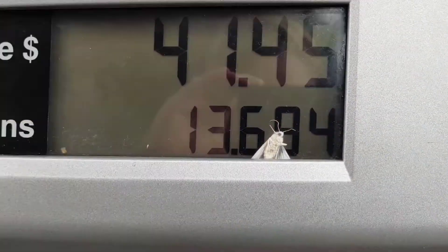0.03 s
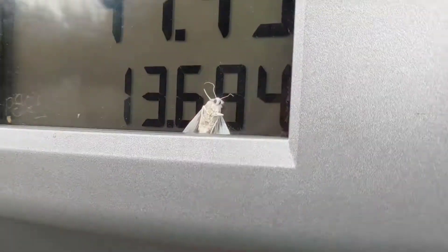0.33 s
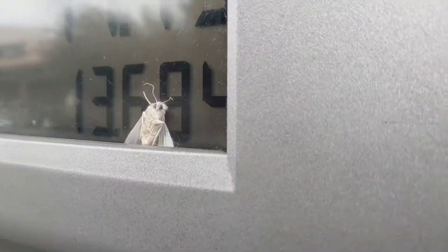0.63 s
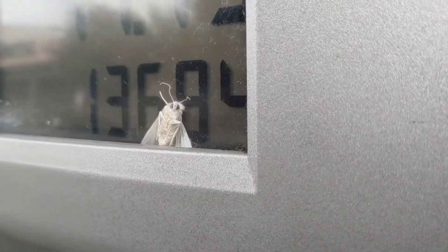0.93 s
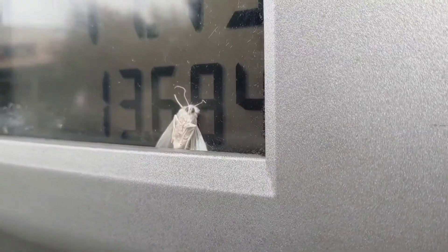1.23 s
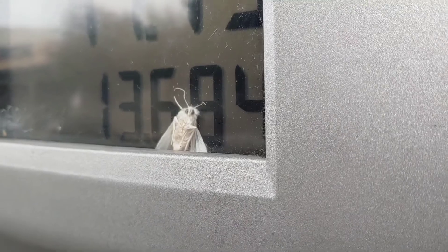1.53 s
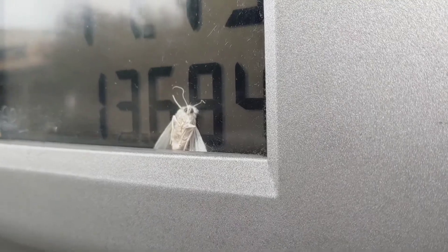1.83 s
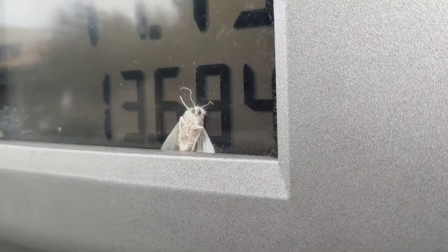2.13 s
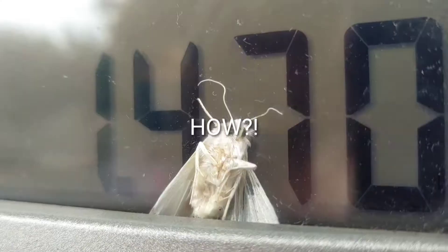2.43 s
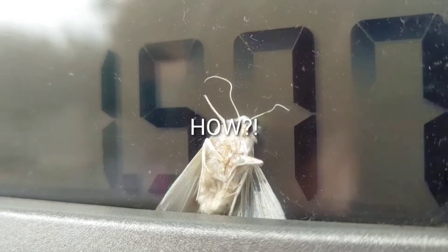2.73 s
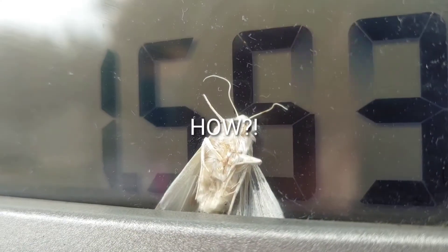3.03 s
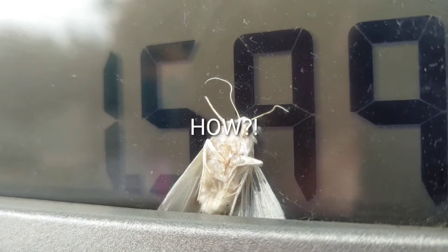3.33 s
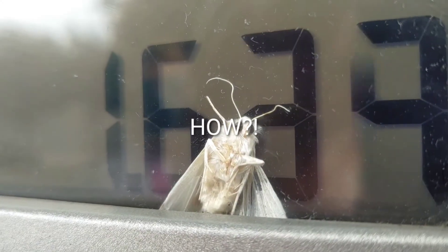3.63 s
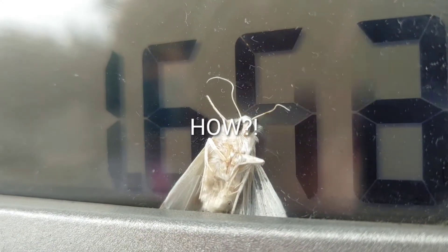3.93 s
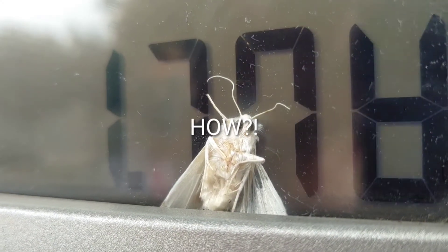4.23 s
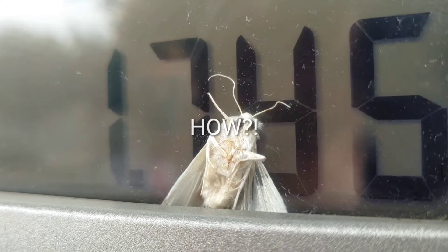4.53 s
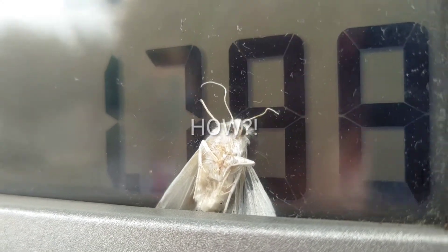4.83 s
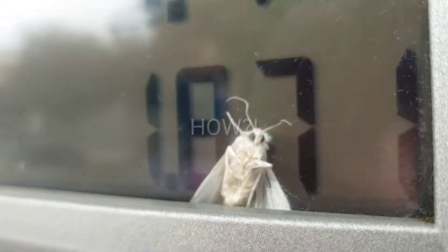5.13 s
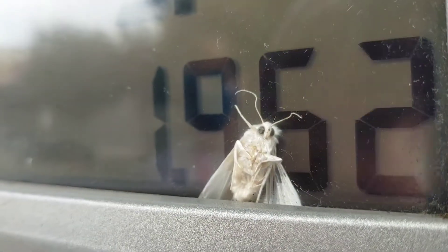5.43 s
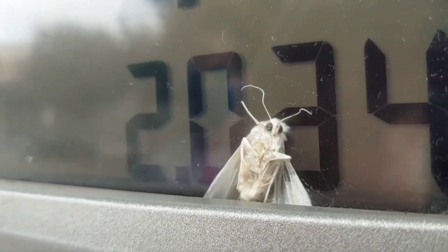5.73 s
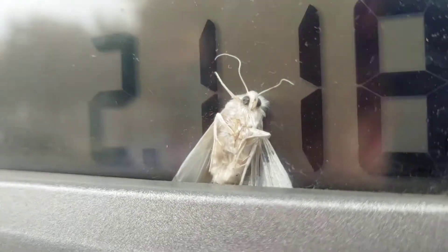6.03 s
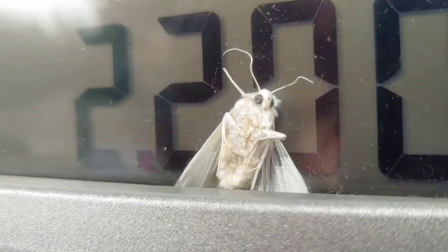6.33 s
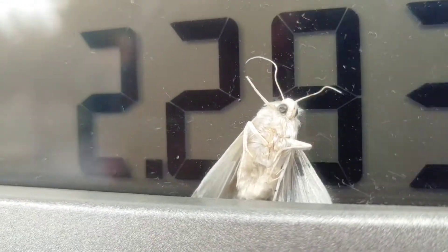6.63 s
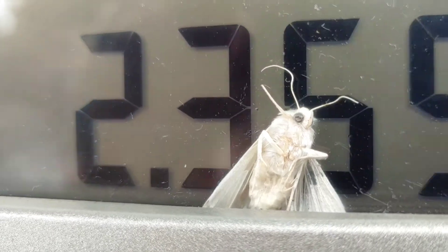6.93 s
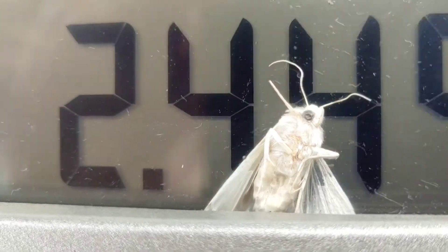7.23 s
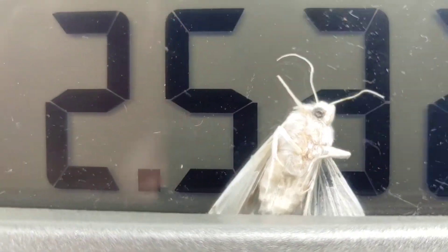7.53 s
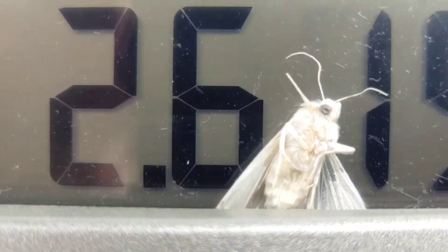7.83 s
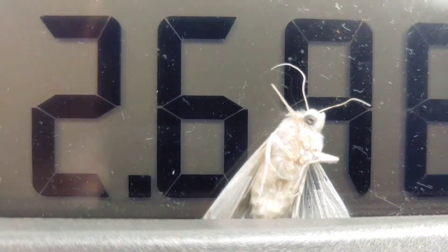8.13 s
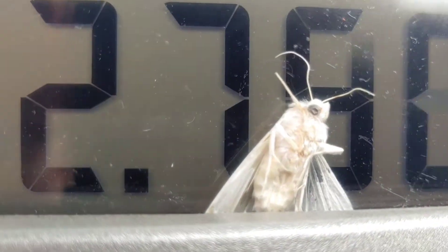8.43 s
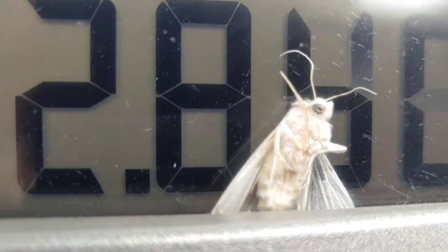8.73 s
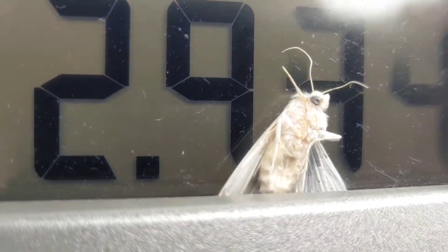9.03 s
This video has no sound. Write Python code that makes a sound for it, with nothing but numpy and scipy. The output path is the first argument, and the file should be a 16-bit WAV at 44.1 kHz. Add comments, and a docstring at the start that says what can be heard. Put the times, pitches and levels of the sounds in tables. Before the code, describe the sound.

A finger rubs the microphone beside a humming, rushing fuel pump; the nozzle clunks, then the pump continues quieter as a distant car pulls away.

```python
"""A finger rubs, then covers, the left microphone beside a running fuel pump.
Fuel rushes through the ringing cabinet under a thin motor whine; nozzle and hose clunk.
The sound cuts off at 2.4 s and fades back in, quieter, with both microphone ports open.
Later a distant car pulls away through its gears and the road rumble grows."""
import sys
import numpy as np
from scipy import signal
from scipy.fft import rfft, irfft
from scipy.io import wavfile
from scipy.ndimage import uniform_filter1d

SR = 44100
rng = np.random.default_rng(int(sys.argv[2]) if len(sys.argv) > 2 else 0)


def transcribe(signal):
    """Save signal, clipped to [-1, 1], as a 16-bit WAV file at the path in sys.argv[1]."""
    frames = np.atleast_2d(signal).T
    limited = np.clip(frames, -1, 1)
    pcm = np.round(limited * 32767).astype(np.int16)
    wavfile.write(sys.argv[1], SR, pcm)


N = 404397
T = np.arange(N) / SR
CUT_S, RESUME_S = 2.41, 2.445
DIP_START_S, DIP_END_S, DIP_DB = 4.864, 4.881, 25.4

# Throttle pulls. Each row: start in seconds, length in seconds, initial firing rate in Hz,
# climb in Hz per second, level in dB, fade in dB per second.
CAR_PULLS = [(5.602, 0.63, 94, 26.5, -45.5, -1.5), (6.6, 0.85, 125.6, 62, -43.5, 6),
             (7.653, 0.53, 192.7, 57.4, -55, 4), (8.571, 0.87, 154.9, 67.8, -53.5, 2)]
# Finger strokes. Each row: start in seconds, length in seconds, level in dB.
FINGER_STROKES = [(0.013, .185, -24), (0.273, 0.15, -27.5), (0.372, 0.11, -23.5)]
# Rubbing skin. Each row: frequency in Hz, relative level in dB.
RUB_SPECTRUM = [(20, -1), (55, 8), (140, 1), (300, -15.5), (600, -25), (1200, -40.5), (3000, -53),
                (6000, -73), (15000, -64)]
# Nozzle and hose knocks. Each row: start in seconds, level in dB, low-pass in Hz, high-pass in Hz,
# decay time constant in seconds, main ring in Hz.
CLUNK_HITS = [(0.856, -30.5, 1300, 500, 0.018, 785), (.961, -32, 1290, 500, 0.013, 785),
              (1.008, -29.5, 1400, 600, 0.0051, 1480), (1.13, -32.5, 1200, 600, .026, 1000),
              (1.29, -23.5, 1700, 600, 0.0063, 122), (1.295, -23.5, 2780, 600, 0.015, 1923),
              (1.343, -24.5, 1400, 500, 0.012, 118), (1.631, -36, 1500, 400, .01, 1460),
              (1.947, -20.5, 1560, 300, 0.015, 430), (2.024, -21, 2070, 500, 0.016, 973),
              (2.057, -25.5, 1500, 600, .012, 1070), (2.235, -29, 1920, 160, 0.018, 230.6),
              (2.3, -22.5, 1100, 250, 0.013, 187), (2.359, -25, 1600, 350, 0.014, 1364)]
# Hardware resonances. Each row: centre in Hz, width in Hz, boost in dB.
HARDWARE_MODES = [(228, 57, 24), (440, 132, 11.5), (758, 770, 10.5), (1074, 330, 4.5), (1436, 340, 9.5),
                  (1930, 400, 9.5), (2820, 1100, 4.5), (4220, 340, 7)]
# Pump motor. Each row: time in seconds, shaft rate in Hz, unsteadiness as a factor.
MOTOR_RUN = [(0, 262.6, 0.8), (2.41, 262.6, 0.9), (2.445, 262, 0.17), (4.864, 261.7, .08),
             (4.881, 262, 0.94), (9.17, 261.9, 1.1)]
# Weak shaft orders. Each row: multiple, level in dB before the cut, level in dB after it.
WEAK_ORDERS = [(7, -91, -105.5), (9, -61, -105), (13, -72, -104), (14, -82, -88), (16, -77.5, -91),
               (17, -72.5, -99), (26, -87, -85.5), (30, -85, -96.5), (39, -84, -92)]
# The whine swells and fades as the microphones move through its standing waves.
# Before the cut, right port. Each row: time in seconds, 6th order in dB, 15th order in dB.
WHINE_BEFORE = [(0, -42, -57), (.18, -39.5, -64.5), (.44, -44, -62.5), (.54, -55, -56.5), (.95, -58, -54),
                (1.28, -49, -59.5), (1.62, -60.5, -74.5), (1.88, -55, -64), (2.41, -54.5, -52)]
# After the cut. Each row: time in seconds, then levels in dB of the 6th order left and right,
# the 15th left and right, and the 18th at both ports.
WHINE_AFTER = [(3.0, -62.5, -57, -70.5, -72, -91), (5.7, -66, -57.5, -70.5, -73.5, -91),
               (6.45, -66.5, -68, -66, -76, -95), (7.25, -64, -85, -71, -87, -83),
               (7.95, -61.5, -72, -79.5, -89, -89), (9.17, -61, -57, -81, -77, -94)]
# Base spectra of fuel and road, before and after the cut.
# Each row: frequency in Hz, left density in dB, right density in dB.
RUSH_BEFORE = [(20, -72, -54.5), (49.3, -56, -46.5), (107, -74.5, -48), (212.5, -87, -56.5),
               (280, -91, -61), (335, -98.5, -68), (506, -99.5, -66.5), (564, -100, -66),
               (1310, -103, -72.5), (2060, -101, -77.5), (2560, -102, -81.5), (3520, -109, -91),
               (5460, -119, -97.5), (9000, -118, -99.5), (15000, -114, -104)]
RUSH_AFTER = [(20.6, -110, -72), (72.6, -67.5, -69), (149, -73.5, -72), (250, -79, -76),
              (477, -90.5, -86.5), (653, -85.5, -82.5), (806, -92, -88), (1330, -99.5, -89),
              (2050, -100, -96.5), (2530, -100.5, -103), (3780, -110.5, -110.5), (5800, -116.5, -114),
              (9600, -118.5, -117.5), (14900, -123, -122)]
# Cabinet resonances. Each row: centre in Hz, width in Hz, then boosts in dB before the cut,
# left after it and right after it.
CABINET_MODES = [(403, 71, 2.5, 1.1, 2), (536, 30, 3.5, 1.3, 1.5), (664.7, 25, 10.5, 1, 8.5),
                 (1072, 43, 0.5, 7.7, 7.5), (1517, 33, 5.5, 1.5, 8), (1966, 20, -1, 1, 5),
                 (2398, 30, 8, 7.3, 12), (2555, 30, 8, 6.5, 6.5), (2910, 60, 5, 2, 7),
                 (3423, 50, 9, 5, 2.5), (5830, 160, -0.5, 8.2, 5), (6440, 620, 0.5, 13.8, 0),
                 (6910, 170, 4, 9.5, -5), (8400, 300, 0, 1, 1.5), (9000, 300, 2, 4.5, 5.5),
                 (10380, 220, 5.5, 2.5, 6)]
# Microphone port colour. Each row: centre in Hz, width in Hz, gain in dB.
PORT_BANDS = [(7700, 510, -7.5), (11080, 700, -13.5), (12450, 460, 6)]
# Slow ramps of road rumble, left midrange, right midrange and flow hiss, in that order.
# Each row: start in seconds, end in seconds, initial gain in dB, final gain in dB.
RUSH_RAMPS = [(4.002, 7.8, -3.5, 1.3), (5.2, 8.7, -0.5, -1), (5.5, 8.6, 0.5, -8), (5.8, 9.17, 2.3, 7)]


def from_db(db):
    return 10 ** (np.asarray(db) / 20)


def unit_rms(x):
    return x / np.sqrt(np.mean(x ** 2) + 1e-20)


def curves(rows, at):
    """Table columns interpolated along the first."""
    first, *columns = np.transpose(rows)
    return np.array([np.interp(at, first, c) for c in columns])


def spectra(rows, hz):
    """Table columns interpolated over log frequency."""
    first, *columns = np.transpose(rows)
    return np.array([np.interp(np.log(hz + 1), np.log(first + 1), c) for c in columns])


def bell(hz, centre_hz, width_hz):
    """Gaussian of height 1; full width at half height."""
    return .5 ** ((2 * (hz - centre_hz) / width_hz) ** 2)


def bands_db(rows, hz):
    """Sum of bell-shaped boosts and cuts."""
    return sum(db * bell(hz, centre_hz, width_hz) for centre_hz, width_hz, db in rows)


def shaped_noise(gain, n=N):
    """Noise of rms 1, shaped by gain(hz)."""
    hz = np.fft.rfftfreq(n, 1 / SR)
    return unit_rms(irfft(rfft(rng.standard_normal(n)) * gain(hz), n))


def wander(rate_hz):
    """Smooth random motion of rms 1, up to about rate_hz."""
    return shaped_noise(lambda hz: bell(hz, 0, 2 * rate_hz))


def envelope(start_s, length_s, attack_s, release_s):
    """Linear rise, hold, exponential release."""
    t = T - start_s
    return np.clip(t / attack_s, 0, 1) * np.exp(-np.maximum(t - length_s, 0) / release_s)


def distant_car(octave_db=-19, waver_db=2.5, jitter=0.018):
    """Exhaust firing tone: climbs with each throttle pull, dies as the driver lifts off."""
    out = np.zeros((2, N))
    pitch_waver = 1 + jitter * wander(32)
    for start_s, length_s, start_hz, climb_hz_per_s, db, fade_db_per_s in CAR_PULLS:
        t = np.clip(T - start_s, 0, length_s)
        firing_hz = (start_hz + climb_hz_per_s * t) * pitch_waver
        phase = 2 * np.pi * np.cumsum(firing_hz) / SR + np.array([[0], [.5]])
        tone = np.sin(phase) + from_db(octave_db) * np.sin(2 * phase)
        throttle = envelope(start_s, length_s, attack_s=0.083, release_s=0.13)
        out += tone * from_db(db - fade_db_per_s * t) * throttle
    return np.sqrt(2) * out * from_db(waver_db * wander(17))


def finger_rub(grip_db=2.9):
    """Skin sticks and slips over the port: a lumpy, dull rumble."""
    scrape = shaped_noise(lambda hz: from_db(spectra(RUB_SPECTRUM, hz)[0]))
    pressure = sum(from_db(db) * envelope(start_s, length_s, attack_s=0.057, release_s=0.02)
                   for start_s, length_s, db in FINGER_STROKES)
    return unit_rms(scrape * from_db(grip_db * wander(120))) * pressure


def clunks(attack_s=0.0025, ring_db=1.5):
    """Loose parts rattle briefly and ring the hardware, one note most; low notes ring harder."""
    out, t = np.zeros(N), T[:SR // 4]
    for start_s, db, lowpass_hz, highpass_hz, decay_s, ring_hz in CLUNK_HITS:
        def colour(hz):
            passband = hz / np.hypot(hz, highpass_hz) / (1 + (hz / lowpass_hz) ** 2)
            return from_db(bands_db(HARDWARE_MODES, hz)) * passband

        rattle = shaped_noise(colour, len(t))
        ring = from_db(ring_db) * np.sin(2 * np.pi * ring_hz * t) / np.hypot(1, ring_hz / 600)
        strike = (1 - np.exp(-t / attack_s)) * np.exp(-t / decay_s)
        start = round(start_s * SR)
        out[start:start + len(t)] += from_db(db) * (rattle + ring) * strike
    return out


def motor_whine(covered_db=-34.5, jitter=0.00301, tremble_hz=40):
    """Shaft orders of the pump motor, made fuzzy by quick trembling of phase and level."""
    shaft_hz, unsteady = curves(MOTOR_RUN, T)
    shaft_rad = 2 * np.pi * np.cumsum(shaft_hz * (1 + jitter * unsteady * wander(120))) / SR
    tremble_rad = 0.2 * unsteady * np.array([wander(tremble_hz), wander(tremble_hz)])
    flutter_db = 1.5 * unsteady * np.array([wander(60), wander(66)])
    left_covered = from_db([[covered_db], [0]])

    def order(k, before_db, after_db):
        phase = round(k) * shaft_rad + np.sqrt(k) * tremble_rad + [[0], [np.pi / 2]]
        gain = np.where(T < CUT_S, from_db(before_db) * left_covered, from_db(after_db))
        return np.sqrt(2) * np.sin(phase) * gain

    before, after = curves(WHINE_BEFORE, T), curves(WHINE_AFTER, T)
    strong = order(6, before[0], after[:2]) + order(15, before[1], after[2:4])
    weak = order(18, -86, after[4]) + sum(order(*row) for row in WEAK_ORDERS)
    return (strong + weak) * from_db(flutter_db)


def port_sealing_db(time_s, sealed_s=.47, closing_s=.1, leak_db=4):
    """Road, left mid, right mid and hiss gains: the left mid drops as the finger seals the port."""
    leak = np.clip((sealed_s - time_s) / closing_s + 1, 0, 1)
    return np.array([[-1.5], [-2], [-2], [1.5]]) + np.outer([0, 1, 0, 0], leak_db * leak)


def slow_drift_db(time_s):
    """Road, left mid, right mid and hiss gains: rumble and hiss grow, the midrange recedes."""
    return np.array([np.interp(time_s, [start_s, end_s], [from_level_db, to_level_db])
                     for start_s, end_s, from_level_db, to_level_db in RUSH_RAMPS])


def fuel_rush(spectrum, modes, drift, patch_db, flicker_db, bass_coherence):
    """Turbulent flow ringing in the cabinet, over road rumble; stereo."""
    hz, time_s, bins = signal.stft(rng.standard_normal((2, N)), SR, nperseg=4096, noverlap=3072)
    bin_hz = hz[:, None]
    shared = bass_coherence * bell(bin_hz, 0, 900)  # only long waves reach both ports alike
    bins[1] = shared * bins[0] + np.sqrt(1 - shared ** 2) * bins[1]
    shape_db = spectra(spectrum, hz) + bands_db(PORT_BANDS, hz)
    shape_db += sum(np.outer(db, bell(hz, centre_hz, width_hz)) for centre_hz, width_hz, *db in modes)
    road_db, left_db, right_db, hiss_db = drift(time_s)
    road_share = 1 / (1 + (bin_hz / 330) ** 4)
    mid_db = np.array([left_db, right_db])[:, None] * bell(bin_hz, 1440, 1100)
    drift_db = road_db * road_share + mid_db + hiss_db * bell(bin_hz, 2270, 1370)
    patches = uniform_filter1d(rng.standard_normal(bins.shape[1:]), size=24, axis=0)
    patches = unit_rms(uniform_filter1d(patches, size=4, axis=1))
    bins *= from_db(shape_db[:, :, None] + drift_db + patch_db * patches * (1 - road_share))
    noise = signal.istft(bins, SR, nperseg=4096, noverlap=3072)[1][:, :N]
    return np.sqrt(SR / 2) * noise * from_db(flicker_db * wander(28))


def fade_in_db(quick_db=39, quick_s=0.12, slow_db=13, slow_s=0.82):
    """Opens quickly after the cut, then creeps up to full level."""
    t = np.maximum(T - RESUME_S, 0)
    return -quick_db * np.exp(-(t / quick_s) ** 2) - slow_db * np.exp(-t / slow_s)


def scene():
    """Pump with finger and clunks, a hard cut, then the quieter pump with the car."""
    modes_before = [(hz, width_hz, db, db) for hz, width_hz, db, _, _ in CABINET_MODES]
    modes_after = [(hz, width_hz, *sides_db) for hz, width_hz, _, *sides_db in CABINET_MODES]
    whine = motor_whine()
    before = whine + fuel_rush(RUSH_BEFORE, modes_before, port_sealing_db,
                               patch_db=0.9, flicker_db=1.1, bass_coherence=0.22)
    before += clunks() * from_db([[-31], [2]])
    before += finger_rub() * from_db([[0], [-28]])
    after = whine + fuel_rush(RUSH_AFTER, modes_after, slow_drift_db,
                              patch_db=0.63, flicker_db=0.84, bass_coherence=1.0)
    after += distant_car() * from_db([[-.5], [.5]])
    dip = (T > DIP_START_S) & (T < DIP_END_S)  # the sound drops out for an instant
    after *= from_db(fade_in_db() - DIP_DB * uniform_filter1d(dip * 1., size=60))
    cut_db = np.interp(T, [CUT_S - .002, CUT_S + .002, RESUME_S], [0, -32, -70])
    return before * from_db(cut_db) * (T < RESUME_S) + after * (T > CUT_S)


def record(dry):
    """Low-pass at 15.4 kHz."""
    lowpass = signal.firwin(511, 15400, window=("kaiser", 9), fs=SR)
    return signal.oaconvolve(dry, lowpass[None], "same")


dry = scene()
out = record(dry)
transcribe(out)
```